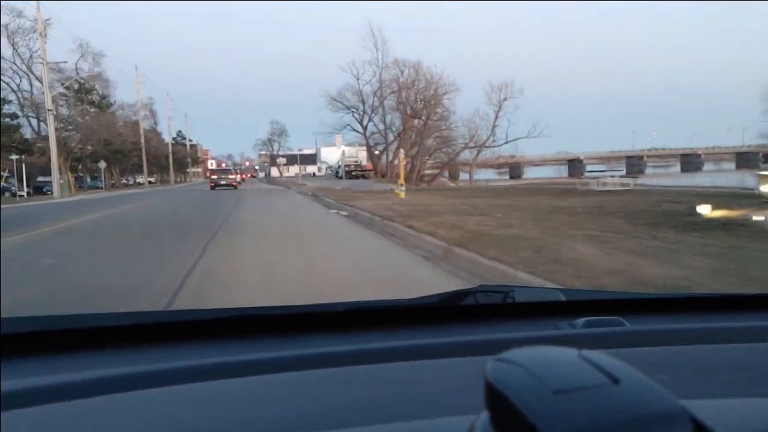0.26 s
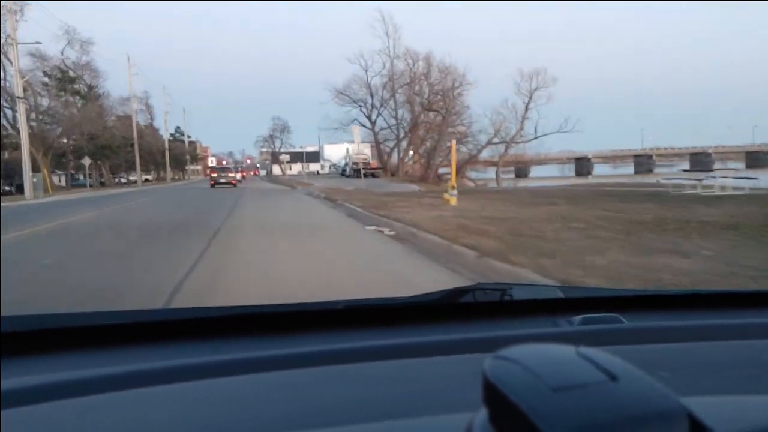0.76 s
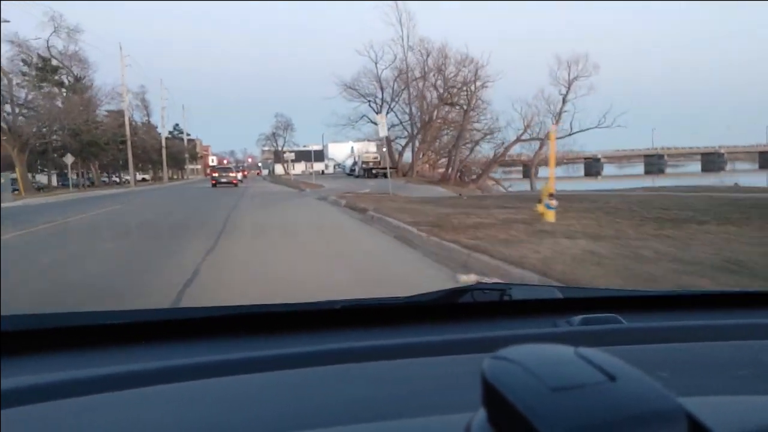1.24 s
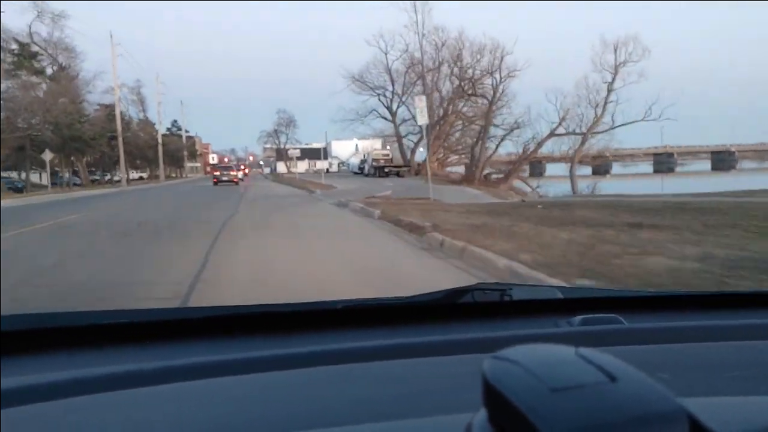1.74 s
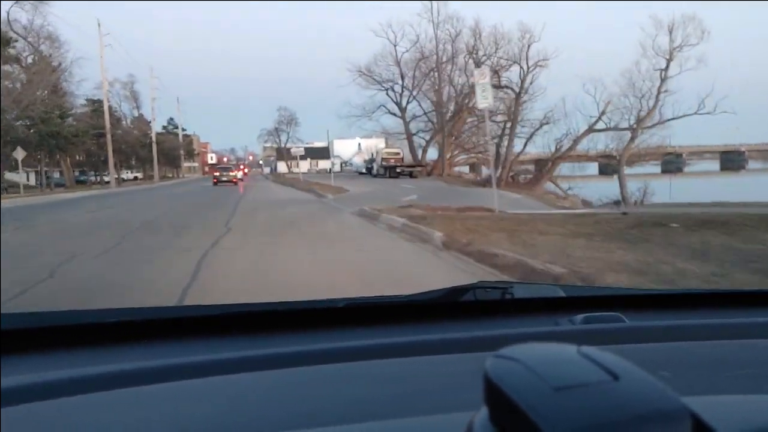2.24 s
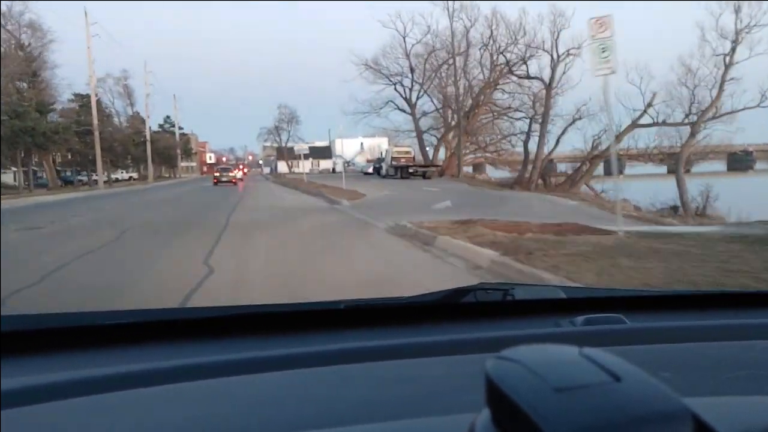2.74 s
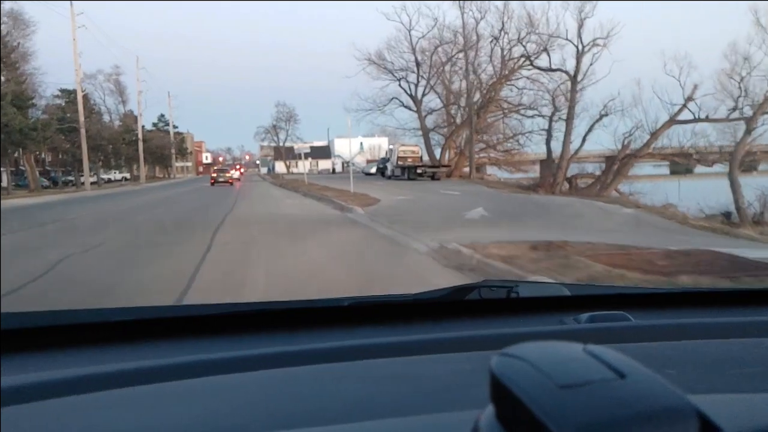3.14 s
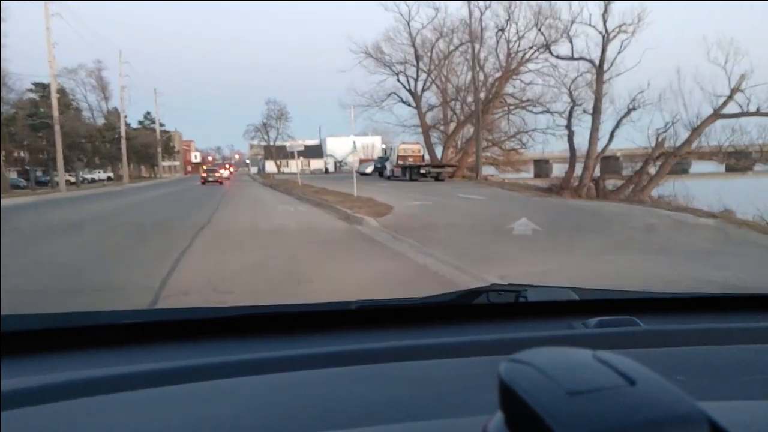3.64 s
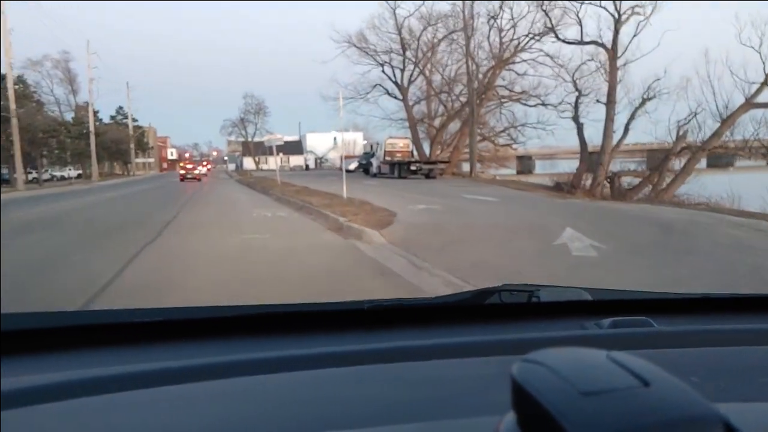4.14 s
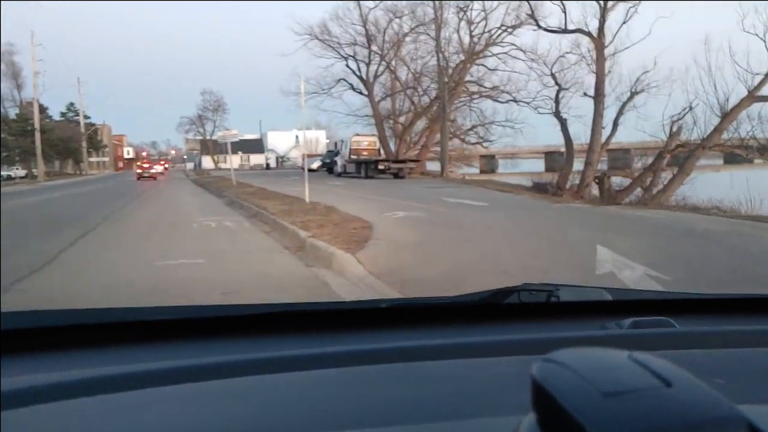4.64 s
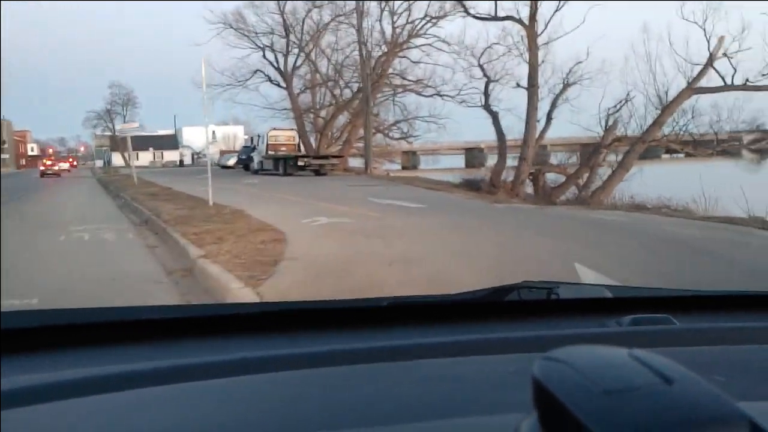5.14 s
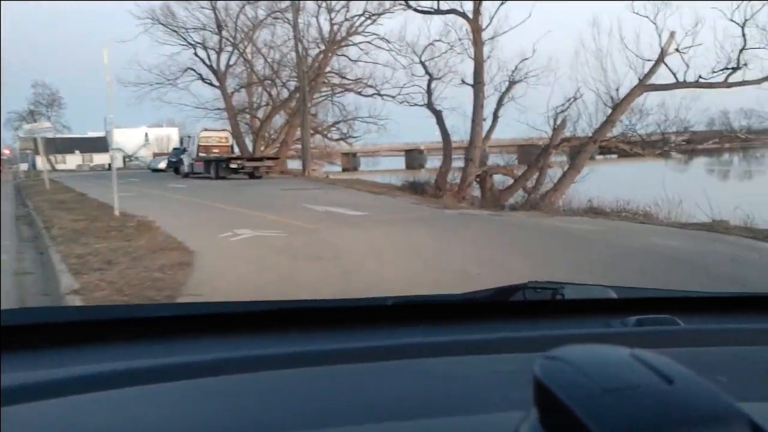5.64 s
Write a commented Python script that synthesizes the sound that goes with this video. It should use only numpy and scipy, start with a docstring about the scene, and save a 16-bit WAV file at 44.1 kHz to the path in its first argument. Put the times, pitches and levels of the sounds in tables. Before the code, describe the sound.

Heard from inside a car, a low tyre drone and road rumble sink in pitch as it slows. A few dull thuds and plastic knocks come early. The indicator stalk clicks on and the turn signal ticks steadily, slightly to the left. Hands slide softly on the steering wheel, the drone pulses more strongly through a turn, then drone and rumble die away as the car reaches a crawl.

```python
"""Inside a car that slows down and turns off the road. From the start the tyre treads drone over road
rumble, falling in pitch with wheel speed. Plastic trim knocks and road seams thud, here and again later.
A faint whistle glides down, and something slides softly on and off, like hands on the steering wheel.
At 1.4 s the indicator stalk clicks on; from 1.8 s the flasher relay ticks. From 3.2 s the turn loads the
tyres and makes them beat more strongly; drone and rumble then die away as the car slows to a crawl."""
import sys
import numpy as np
from scipy import signal
from scipy.fft import rfft, irfft
from scipy.io import wavfile
from scipy.ndimage import uniform_filter1d

SR = 44100
rng = np.random.default_rng(int(sys.argv[2]) if len(sys.argv) > 2 else 0)


def to_wav(sig):
    """Store sig (one row per channel, or 1-D mono) as 16-bit WAV at the path in sys.argv[1].

    Samples outside -1..1 are clipped; the rate is SR.
    """
    pcm = np.clip(np.atleast_2d(sig), -1, 1) * 32767
    pcm = np.round(pcm).astype(np.int16)
    wavfile.write(sys.argv[1], SR, pcm.T)  # frames by channels


N = 259308
TIME = np.arange(N) / SR
BINS_HZ = np.maximum(np.fft.rfftfreq(N, 1 / SR), 1)
CRUISE_TURNS_PER_S = 6.5


def from_db(db):
    """Decibels to gain."""
    return 10 ** (np.asarray(db) / 20)


def unit_rms(x):
    """Scale to rms 1."""
    return x / np.sqrt(np.mean(x ** 2) + 1e-20)


def at_hz(points, hz):
    """Interpolate a spectrum on a log-frequency axis."""
    freq_hz, value = np.transpose(points)
    return np.interp(np.log(hz), np.log(freq_hz), value)


def add(out, start_s, sound):
    """Mix a sound in at start_s."""
    start = int(start_s * SR)
    out[:, start:start + sound.shape[-1]] += sound[:, :N - start]


def drift(rate_hz, hop=60):
    """Low-passed random wander, rms 1."""
    white = rng.standard_normal(N // hop + 2)
    hz = np.fft.rfftfreq(len(white), hop / SR)
    slow = unit_rms(irfft(rfft(white) / (1 + (hz / rate_hz) ** 4), len(white)))
    return np.interp(np.arange(N) / hop, np.arange(len(slow)), slow)


def resonance(hz, half_width_hz):
    """Randomly shaken resonance: narrow noise around a steady or moving pitch, rms 1."""
    angle = 2 * np.pi * np.cumsum(hz * np.ones(N)) / SR
    return drift(half_width_hz) * np.sin(angle) + drift(half_width_hz) * np.cos(angle)


# Left-right likeness in the cabin: freq_hz, correlation
STEREO_LIKENESS = [(30, 0.68), (100, 0.96), (200, 0.8), (380, 0.91), (520, 0.014), (1100, 0.03),
                   (4000, 0.1), (12000, 0.36)]


def noise(colour_db, size=N):
    """Partly correlated stereo noise, colour given at BINS_HZ, rms 1."""
    hz = np.maximum(np.fft.rfftfreq(size, 1 / SR), 1)
    alike = np.clip(at_hz(STEREO_LIKENESS, hz), 0, 1)
    mid, side = rfft(rng.standard_normal((2, size)))
    stereo = np.sqrt(1 + alike) * mid + np.sqrt(1 - alike) * side * [[1], [-1]]
    return unit_rms(irfft(stereo * from_db(np.interp(hz, BINS_HZ, colour_db)), size))


# Wheel speed: time_s, turns_per_s
WHEEL_SPEED = [(0.0, 6.84), (0.9, 6.4), (1.47, 6.015), (2.2, 5.36), (3.5, 4.305), (4.04, 3.614),
               (4.78, 2.866), (5.51, 1.781), (5.88, 1.554)]


def wheel_speed():
    """Turns per second at every sample: the driver brakes ever harder, then eases off."""
    return np.interp(TIME, *np.transpose(WHEEL_SPEED))


def crawl_db(speed, knee_turns_per_s, db_per_halving=17.5):
    """No loss at speed, a steady loss per halving below the knee."""
    exponent = db_per_halving / (10 * np.log10(2))
    return -10 * np.log10(1 + (knee_turns_per_s / speed) ** exponent)


def swells_db(swells):
    """Bell-shaped rises and dips in level."""
    return sum(db * np.exp(-((TIME - centre_s) / half_s) ** 2) for centre_s, half_s, db in swells)


# Cabin air modes and nulls: centre_hz, width_hz, gain_db
CABIN_MODES = [(100.3, 107.6, 13.5), (98, 39, -0.5), (145.9, 20, 8.5), (178.9, 8.3, 14), (186.5, 16, -8),
               (234.9, 12.4, 11.5), (264.3, 12, -12.5), (281.6, 10, 7), (342.6, 95, 10)]


def boom_db(hz):
    """Lift in the cabin's air modes, loss in the nulls between them."""
    return sum(db / (1 + (2 * (hz - centre) / width) ** 2) for centre, width, db in CABIN_MODES)


# Tread lines: wheel_order, level_db
TREAD_ORDERS = [(26, -18), (27, -22), (28, -18), (29, -18), (47, -16), (49, -13), (51, -15), (52, -10),
                (53, 0), (54, -6), (55, -9), (56, -10), (57, -1), (58, -5), (59, -13), (60, -6), (61, -14),
                (63, -12), (64, -11), (65, -15), (67, -21)]
# Tyre-to-cabin path through the body: freq_hz, gain_db
BODY_PATH = [(60, 7.5), (105, -1.5), (150, 0.5), (370, 0.5), (395, 0.5), (425, -11), (600, -28), (900, -32)]


def tyre(speed, jostle_rad, octave_db=-14.5):
    """Uneven tread blocks sound at multiples of the wheel's rotation; the road jostles their phases."""
    wheel_angle = 2 * np.pi * np.cumsum(speed) / SR
    hz = np.arange(1, 1000)
    path_gain = from_db(at_hz(BODY_PATH, hz) + boom_db(hz))
    out = 0
    for order, db in TREAD_ORDERS:
        phase = order * wheel_angle + rng.uniform(0, 2 * np.pi) + jostle_rad * drift(4.77)
        line = np.interp(order * speed, hz, path_gain) * np.sin(phase)
        octave = np.interp(2 * order * speed, hz, path_gain) * np.sin(2 * phase)
        out += from_db(db) * (line + from_db(octave_db) * octave)
    return out


def drone_gain(speed, base_db=-37.5, db_per_halving=13):
    """The drone weakens as the wheels slow and swells where a strong order meets a cabin mode."""
    grid = np.linspace(speed.min(), speed.max(), 1000)
    power = sum(from_db(db + at_hz(BODY_PATH, order * grid) + boom_db(order * grid)) ** 2
                for order, db in TREAD_ORDERS)
    level_db = base_db + db_per_halving * np.log2(grid / CRUISE_TURNS_PER_S)
    level_db += crawl_db(grid, knee_turns_per_s=1.73)
    return np.interp(speed, grid, from_db(level_db) * np.sqrt(power))


# Brief swells and dips in the drone's loudness: centre_s, half_length_s, gain_db
DRONE_SWELLS = [(0.0, 0.23, -4), (2.42, 0.24, -3), (3.66, 0.08, 2), (3.81, 0.06, -8), (4.33, 0.15, -3),
                (5.05, 0.092, -2.5), (5.3, 0.14, 3)]


def tread_drone(turn_s=3.2, turn_in_s=1.036, turn_load_db=7, scrub_s=1.6, scrub_in_s=1.6):
    """Two tyres beat together; braking scrubs the treads, steering loads them and splits their speeds."""
    speed = wheel_speed()
    steering = np.clip((TIME - turn_s) / turn_in_s, 0, 1)
    slip = 0.0023 * drift(2.54)
    far_speed = speed * (1 + slip + 0.026 * steering)
    far_gain = from_db(-13 + 8 * steering)
    jostle_rad = 0.42 + 0.6 * np.clip((TIME - scrub_s) / scrub_in_s, 0, 1)
    pair = tyre(speed, jostle_rad) + far_gain * tyre(far_speed, jostle_rad)
    # Even load all round the tyre: keep only the fast beats.
    slow_power = uniform_filter1d(uniform_filter1d(pair ** 2, size=2400), size=4600)
    swell_db = swells_db(DRONE_SWELLS) + 0.76 * drift(5.6)
    gain = drone_gain(speed) * from_db(turn_load_db * steering + swell_db)
    return gain * pair / np.sqrt(slow_power + 1e-12)


# Body rumble, tyre roar and rushing air: freq_hz, density_db
RUMBLE_SPECTRUM = [(15, -32.5), (35, -5.5), (60, -11.5), (80, -4), (105, -2), (150, 1), (195, 7),
                   (255, 2.5), (310, 4.5), (375, -1), (420, -12), (520, -65.5)]
ROAR_SPECTRUM = [(280, -28), (420, 5), (500, 5.5), (570, -4), (630, -2), (750, -8.5), (890, -7.5),
                 (1180, -15), (1290, -20), (1500, -24), (1800, -37.5), (3000, -52)]
AIR_SPECTRUM = [(900, 1), (1600, 1.5), (2200, -1.5), (2750, 0), (3400, -6.5), (5500, -17.5), (12000, -48.5),
                (14000, -69.5)]
# Worn asphalt: centre_s, half_length_s, gain_db
WORN_PATCHES = [(0.243, 0.23, 4), (2.849, 0.88, 2.5), (3.995, 0.26, 2)]
# Dashboard panels: pitch_hz, half_width_hz, level_re_roar_db
DASH_PANELS = [(629, 16, -13), (836, 40, -15.5), (939, 34, -18), (1094, 29, -21.5), (1160, 24, -22),
               (1364, 19, -28)]


def road(air_re_roar_db=-21, roar_flutter_db=1.3, panel_flutter_db=3):
    """Coarse asphalt shakes the body; the tyres roar unevenly and ring the dashboard; the air hisses."""
    speed = wheel_speed()
    worn_db = swells_db(WORN_PATCHES)
    rumble_db = -35 + worn_db + crawl_db(speed, knee_turns_per_s=2.74)
    rumble = from_db(rumble_db) * noise(at_hz(RUMBLE_SPECTRUM, BINS_HZ) + 0.7 * boom_db(BINS_HZ))
    roar_db = -49 + 3.5 * (speed - CRUISE_TURNS_PER_S)
    uneven_db = 0.66 * worn_db + roar_flutter_db * drift(18)
    roar = from_db(roar_db + uneven_db) * noise(at_hz(ROAR_SPECTRUM, BINS_HZ))
    air = from_db(roar_db + air_re_roar_db) * noise(at_hz(AIR_SPECTRUM, BINS_HZ))
    panels = sum(from_db(roar_db + db + panel_flutter_db * drift(4.1)) * resonance(hz, half_width_hz)
                 for hz, half_width_hz, db in DASH_PANELS)
    return rumble + roar + panels + air


def snap(t, blow_db, tilt_db_per_octave, hard_blow_db=-29, decay_s=0.00056):
    """Short crack of noise; louder knocks are brighter."""
    relative_db = blow_db - hard_blow_db
    top_hz = np.clip(15000 * 2 ** (relative_db / 10), 8000, 15000)
    gain = 2 * from_db(9 + 2 * min(tilt_db_per_octave, 0) + 0.5 * relative_db)
    crack = gain * np.exp(-t / decay_s) * rng.standard_normal((2, len(t)))
    band = signal.lfilter(*signal.butter(1, [2500, 7000], "band", fs=SR), crack)
    return signal.sosfilt(signal.butter(6, top_hz, fs=SR, output="sos"), band)


def blow_colour_db(hz, body_db, tilt_db_per_octave):
    """Spectrum of a blow: a shelf below 1.7 kHz plus a tilt about 3 kHz."""
    return body_db / (1 + (hz / 1700) ** 6) + tilt_db_per_octave * np.log2(np.maximum(hz, 700) / 3000)


# Trim modes: pitch_hz, level_db
TRIM_MODES = [(985, 6), (1373, -6.5), (1620, -7.5), (2117, -12), (2272, -7.5), (2463, -7.5), (2875, 2),
              (3200, -3.5), (3770, 0.5), (4230, 0), (4960, -7.5), (5225, 2.5), (6821, -7.5), (7480, -9.5),
              (8000, -5.5)]
# Noisy tail of a plastic click: freq_hz, density_db
PLASTIC_SPECTRUM = [(250, -25), (450, 2.5), (780, -1.5), (1080, 4.5), (1500, 2), (1750, -5.5), (2300, 1),
                    (3100, -1.5), (3900, 0), (5200, -3.5), (6000, -5.5), (7600, -5), (9500, -20.5),
                    (11800, -12), (12500, -17), (13200, -40.5)]
# Blows on stalk and trim:
# start_s, level_db, body_db, tilt_db_per_octave, t60_s, ring1_hz, ring2_hz, ring_db
PLASTIC_KNOCKS = [(0.189, -57, 26, -19.5, 0.15, 1220, 1030, 4),
                  (0.257, -40.5, 36, -17.5, 0.093, 956, 1470, -10),
                  (.428, -51.5, 32, -11, 0.33, 960, 1345, -2), (.935, -79, -14, 7, 0.079, 8000, 12000, 9.5),
                  (1.3634, -47.5, -15, -5.5, 0.07, 3380, 3950, 6),
                  (1.37, -45, -26, 0.5, 0.065, 4230, 3630, 1.5),
                  (1.378, -44.5, 15, 1.5, 0.11, 4100, 3040, -15),
                  (1.387, -48, 21, -15, 0.044, 950, 1360, -12),
                  (1.425, -50.5, 4, -1, 0.062, 1280, 2580, -5.5),
                  (1.433, -38.5, 9, -0.5, 0.077, 3156, 4230, -7.5),
                  (1.439, -37.5, 13, 1, 0.07, 3250, 2600, -5),
                  (1.442, -38, 12, -10.5, 0.094, 870, 1600, -3),
                  (1.456, -47.5, 19, 2.5, 0.11, 456, 4470, 0),
                  (2.068, -55.5, -8, 1, 0.067, 4630, 7580, 6.5),
                  (3.338, -64.5, -7, -4, 0.094, 2700, 4400, -1),
                  (3.6397, -46, 2, -3.5, 0.058, 2605, 1580, -3),
                  (3.756, -60, -18, -8.5, 0.063, 2900, 4710, -7),
                  (4.346, -33, -9, 0.5, 0.042, 2270, 5150, 3),
                  (4.352, -34.5, -1, 2, 0.077, 1550, 1070, -10), (4.922, -57, 11, 3.5, 0.12, 2940, 2400, 0),
                  (4.946, -60.5, -4, 0, 0.1, 2810, 2910, 8)]


def knocks(trim_db=-3, ring_extra_loss_db_per_s=450, rise_s=0.0006):
    """Struck plastic snaps; the piece rings out quickly, the trim and cabin reflections a little later."""
    out, t = np.zeros((2, N)), TIME[:SR // 5]
    plastic_db = at_hz(PLASTIC_SPECTRUM, BINS_HZ)

    def tone(hz):
        return np.sin(2 * np.pi * hz * t + rng.uniform(0, 2 * np.pi) + rng.normal(0, 1, (2, 1)))

    for start_s, db, body_db, tilt, t60_s, ring1_hz, ring2_hz, ring_db in PLASTIC_KNOCKS:
        trim = sum(from_db(mode_db + blow_colour_db(hz, body_db, tilt)) * tone(hz)
                   for hz, mode_db in TRIM_MODES)
        scatter = noise(plastic_db + blow_colour_db(BINS_HZ, body_db, tilt), size=len(t))
        piece = from_db(ring_db - ring_extra_loss_db_per_s * t) * (tone(ring1_hz) + tone(ring2_hz))
        clack = (1 - np.exp(-t / rise_s)) * (from_db(trim_db) * unit_rms(trim) + piece + scatter)
        add(out, start_s, from_db(db - 60 * t / t60_s) * (snap(t, db, tilt) + clack))
    return out


# Road seams: time_s, level_db, pitch_hz
ROAD_SEAMS = [(0.276, -27, 185.4), (.32, -24, 107), (0.514, -23, 103.9), (3.377, -19.5, 89),
              (5.74, -32, 99.7)]
# Partials of one thud: pitch_ratio, level_db, lead_s, half_length_s
THUD_PARTIALS = [(0.569, -21.5, 0.0068, 0.017), (0.999, -0.5, 0, 0.025), (1.258, -4.5, 0.0084, 0.041),
                 (1.682, -3, 0.011, 0.014), (2.084, -16, 0.002, 0.11)]


def bumps():
    """The suspension softens each seam to a few swelling cycles."""
    out = np.zeros(N)
    for time_s, db, hz in ROAD_SEAMS:
        t = TIME - time_s
        for ratio, partial_db, lead_s, half_length_s in THUD_PARTIALS:
            swell = from_db(db + partial_db) * np.exp(-((t + lead_s) / half_length_s) ** 2)
            out += swell * np.sin(2 * np.pi * ratio * hz * t + rng.uniform(0, 2 * np.pi))
    return out


def whistle(peak_s=0.7, half_length_s=0.23, level_db=-77.5, pitch_hz=2730, sag_hz_per_s=780):
    """A narrow band of airy hiss swells, glides down and fades."""
    t = TIME - peak_s
    swell = from_db(level_db) * np.exp(-(t / half_length_s) ** 2)
    return swell * resonance(pitch_hz - sag_hz_per_s * t, half_width_hz=110)


def early_echoes(x, gain=0.24, count=6):
    """Windscreen, roof and dashboard echoes comb the sound, differently in each channel."""
    out = x.copy()
    for channel in 0, 1:
        for lag in (rng.uniform(0.0008, 0.009, count) * SR).astype(int):
            out[channel, lag:] += gain * rng.choice([-1, 1]) * x[channel, :-lag]
    return out / np.sqrt(1 + count * gain ** 2)


# Light and coarse friction: freq_hz, density_db
LIGHT_RUB_SPECTRUM = [(600, -18), (1300, 0), (2000, -10.5), (2800, -5.5), (3400, -10), (4100, -4.5),
                      (5200, -12), (6600, -3.5), (7400, -5.5), (8300, -5), (9300, -10.5), (10500, -10),
                      (11600, -4.5), (12200, -11.5), (12900, -45), (14000, -71)]
COARSE_RUB_SPECTRUM = [(800, 2.5), (2100, -36), (3200, -9.5), (3900, -1.5), (4400, 0.5), (4850, -0.5),
                       (5400, 1.5), (5750, -4), (6600, 1), (8100, -7), (9300, -18), (11500, -8),
                       (12400, -13.5), (13000, -49.5), (14000, -70.5)]
# Hands resting or sliding on the wheel: peak_s, level_db, attack_s, hold_s, coarse_share
HAND_STROKES = [(0.75, -83.5, 0.36, 2.2, 0), (1.305, -76.5, 0.067, 0.16, 1),
                (2.371, -73.5, 0.18, 3.47, 0.1), (2.512, -53.5, 0.2, 0.14, 0.89),
                (2.62, -56.5, .04, .025, 1), (2.85, -64, 0.12, 0.072, 0.2), (3.78, -69, .07, 0.019, 0.08),
                (4.586, -56.5, 0.2, 0.34, 0.28), (5.141, -65, 0.13, 0.016, 0.1),
                (5.349, -60.5, 0.042, 0.028, 0.3), (5.7, -73, 0.042, 0.023, 0.4)]


def sliding(release_s=0.075, grip_flicker_db=1.14):
    """Friction hiss: strokes swell, hold and let go, coarser under pressure, flickering with the grip."""
    light_power, coarse_power = np.zeros((2, N))
    for peak_s, db, attack_s, hold_s, coarse_share in HAND_STROKES:
        t = TIME - peak_s
        pressure = np.exp(np.minimum(t, 0) / attack_s - np.maximum(t - hold_s, 0) / release_s)
        power = (from_db(db) * pressure) ** 2
        roughness = np.clip(coarse_share, 0, 1) * np.sqrt(pressure)
        light_power += power * (1 - roughness)
        coarse_power += power * roughness
    light = np.sqrt(light_power) * noise(at_hz(LIGHT_RUB_SPECTRUM, BINS_HZ))
    coarse = np.sqrt(coarse_power) * noise(at_hz(COARSE_RUB_SPECTRUM, BINS_HZ))
    return early_echoes(from_db(grip_flicker_db * drift(32)) * (light + coarse))


# Relay housing modes: pitch_hz, closing_db, opening_db, t60_s
RELAY_MODES = [(597, -4.5, -19, 0.092), (685, -10.5, -23, 0.04), (838, -16, -14, 0.053),
               (1069, 2, -5.5, 0.036), (1240, -19.5, -12.5, 0.05), (1352, -8, -12.5, 0.094),
               (1800, -16.5, -27, 0.036), (3995, -16, -29, 0.051), (4080, -3.5, -18, 0.023),
               (4310, -15.5, -6.5, 0.04), (4830, -20.5, -14.5, 0.056), (5500, -28.5, -19, 0.032),
               (5720, -32, -17, 0.025), (6080, -22, -20, 0.06), (8060, -29.5, -16, 0.024)]


def relay_click(t, phases, closing, swell_cycles=3.15, hold_cycles=10, right_lag_s=0.0004):
    """The relay rings its housing: each tick swells briefly and rings out with a faint noisy tail."""
    def envelope(rise_s, hold_s, t60_s):
        return np.exp(np.minimum(t, 0) / rise_s) * from_db(-60 * np.maximum(t - hold_s, 0) / t60_s)

    arrival_s = t - np.array([[0], [right_lag_s]])
    ring = 0
    for (hz, closing_db, opening_db, t60_s), phase in zip(RELAY_MODES, phases):
        gain = from_db(closing_db if closing else opening_db)
        tone = np.sin(2 * np.pi * hz * arrival_s + phase[:, None])
        ring += gain * envelope(swell_cycles / hz, hold_cycles / hz, t60_s) * tone
    tail = from_db(-15) * noise(at_hz(PLASTIC_SPECTRUM, BINS_HZ), size=len(t))
    return ring + envelope(rise_s=0.0029, hold_s=0, t60_s=0.08) * tail


def flasher(on_s=1.8003, period_s=0.7012, lit_s=0.3585, level_db=-46, spread_db=1, lead_s=0.02):
    """The relay, off to the left, closes once a blink and opens about halfway through: tick, tock."""
    out, t = np.zeros((2, N)), TIME[:SR // 5] - lead_s
    mode_count = len(RELAY_MODES)
    phases = rng.uniform(0, 2 * np.pi, (mode_count, 1)) + rng.normal(0, 0.73, (mode_count, 2))
    for blink_s in np.arange(on_s, N / SR - lit_s, period_s):
        for click_s, closing in (blink_s, True), (blink_s + lit_s, False):
            click = relay_click(t, phases, closing)
            add(out, click_s - lead_s, from_db(level_db + spread_db * rng.normal()) * click)
    return out * from_db([[1], [-1]])


# Cabin balance: freq_hz, left_minus_right_db
STEREO_BALANCE = [(35, 2.5), (65, -1.5), (100, 8.5), (135, 4), (190, -0.5), (232, 3), (285, -2), (315, 3),
                  (345, 5.5), (385, 6), (520, 3), (1100, 4.5), (2200, 0), (4200, 2), (10000, 2)]


def scene():
    """All cabin sources, leaning mostly left by an amount that varies with frequency."""
    cabin = tread_drone() + bumps() + road() + whistle() + sliding() + flasher() + knocks()
    lean = from_db(at_hz(STEREO_BALANCE, BINS_HZ) * np.array([[0.5], [-0.5]]))
    lean /= np.sqrt(np.mean(lean ** 2, axis=0))
    return irfft(rfft(cabin) * lean, N)


def record(dry):
    """Brief fade-in, right channel delayed, top cut."""
    fade_s, right_lag_s, cutoff_hz = 0.006, 0.00415, 15800
    left, right = dry * np.sin(np.pi / 2 * np.minimum(TIME / fade_s, 1)) ** 2
    late_right = np.pad(right, (round(right_lag_s * SR), 0))[:N]
    lowpass = signal.ellip(8, 0.5, 60, cutoff_hz, fs=SR, output="sos")
    return signal.sosfilt(lowpass, np.stack([left, late_right]))


dry = scene()
out = record(dry)
to_wav(out)
```